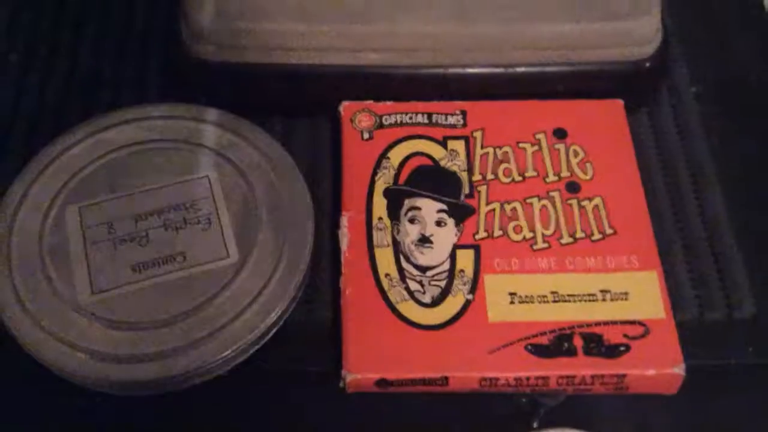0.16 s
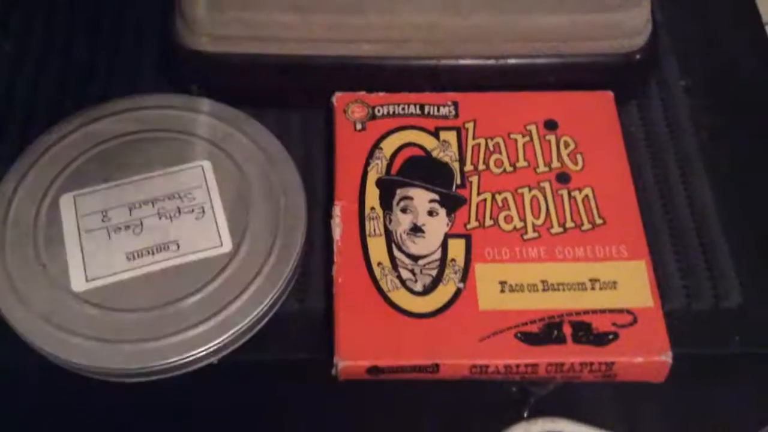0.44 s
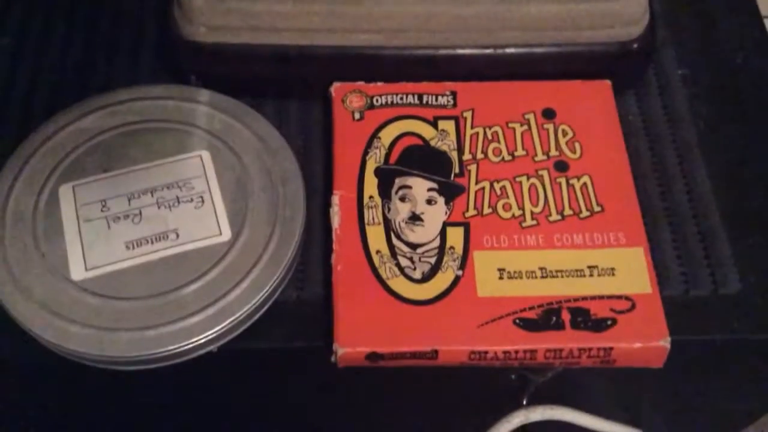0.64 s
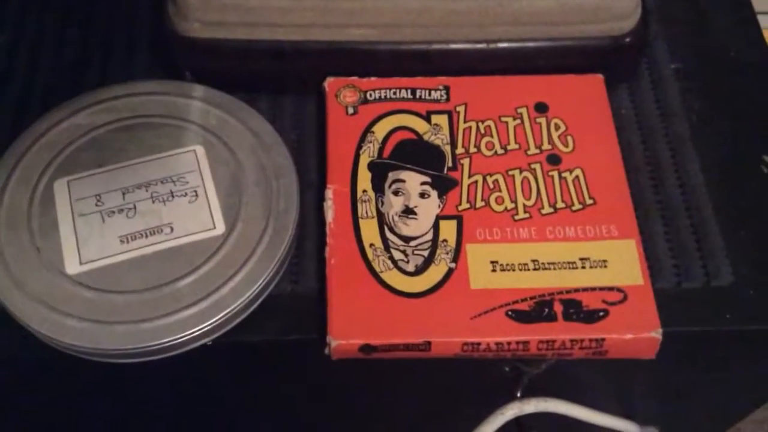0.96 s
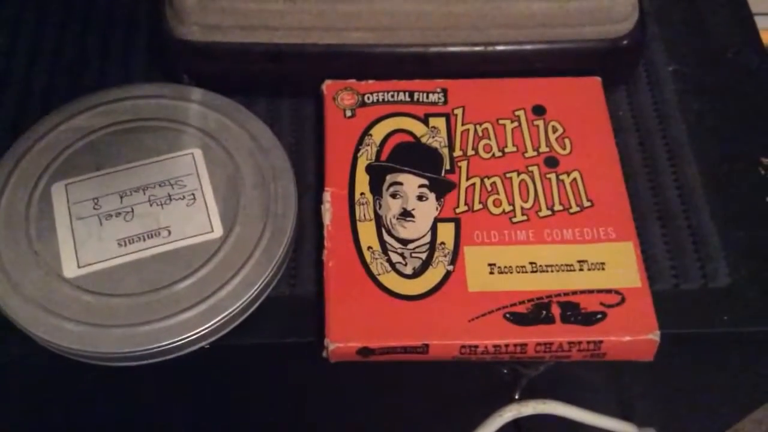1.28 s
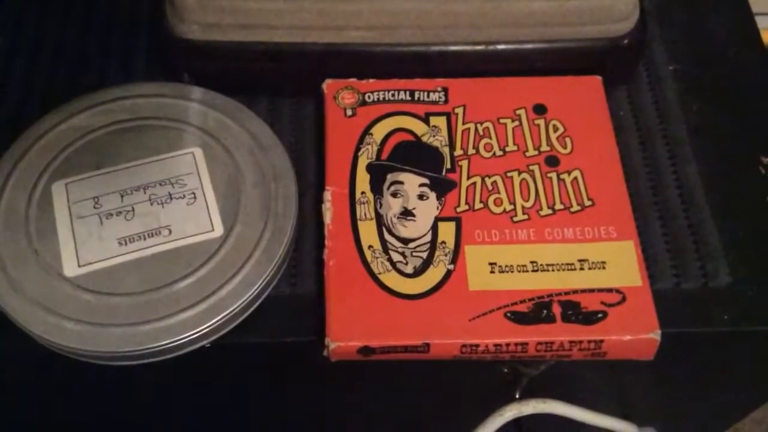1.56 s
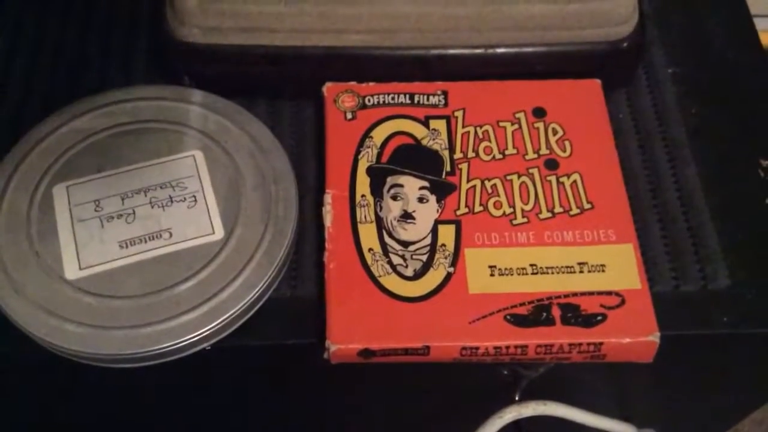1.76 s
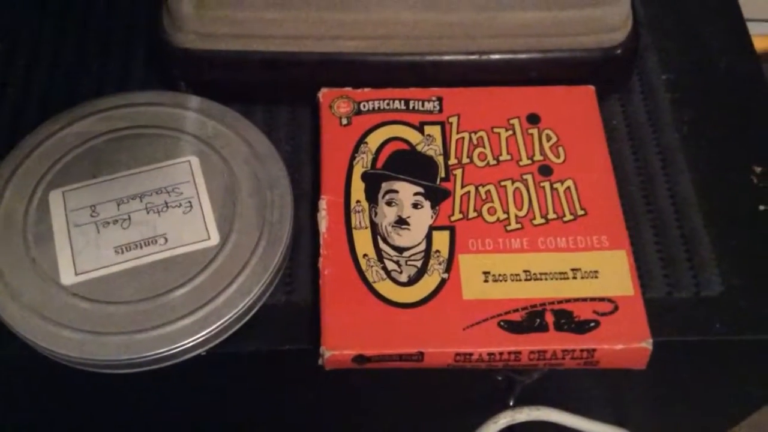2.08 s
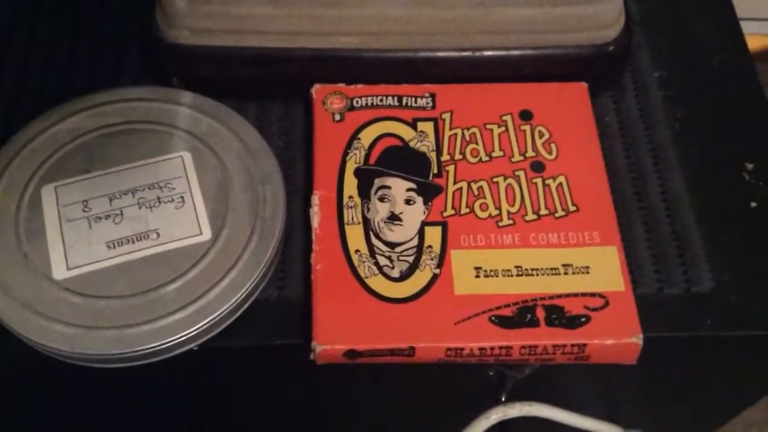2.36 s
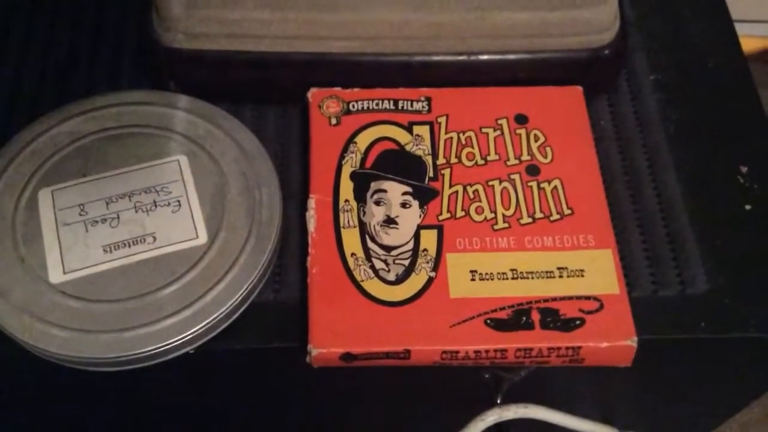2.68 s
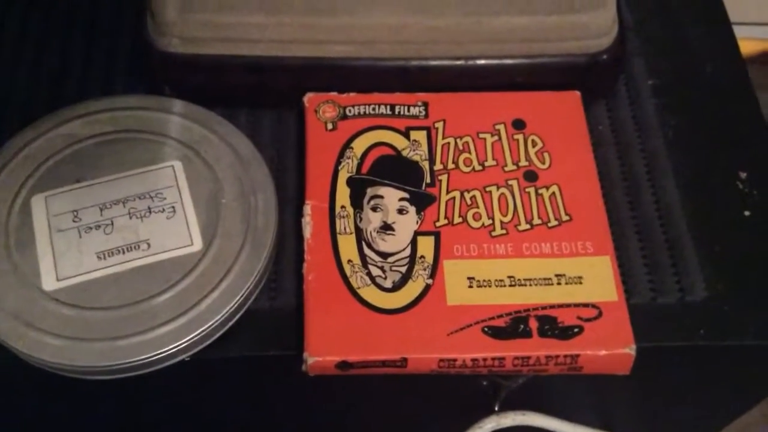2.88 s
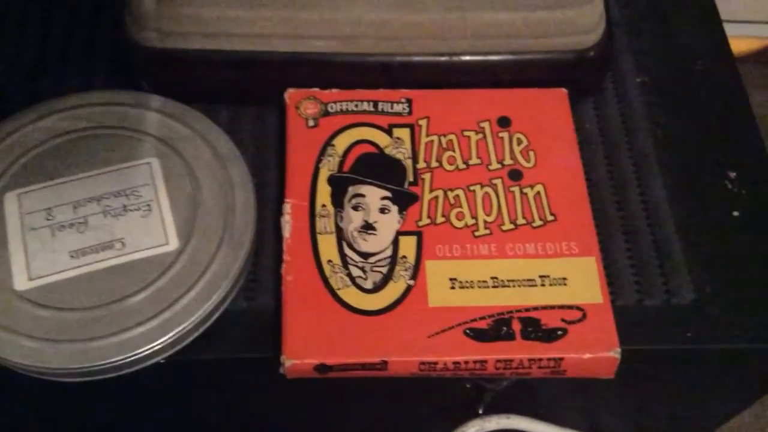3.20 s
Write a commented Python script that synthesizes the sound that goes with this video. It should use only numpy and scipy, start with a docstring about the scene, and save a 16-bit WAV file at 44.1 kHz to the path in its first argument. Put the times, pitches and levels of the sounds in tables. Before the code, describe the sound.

A film projector clatters close by in a small room. Near silence lasts until 0.12 s, then the machine cuts in at full speed. Bright steel ticks, about 25 per second, carry short film scrapes and dull knocks, the sharp ticks softening around 1.55 s. Churning gears, airy whirr, faint swelling whine and low hum continue beneath; barely noticeable soft bass bumps fall near 0.2 and 2.9 s. It runs to the end, about 3.3 s.

```python
"""After about an eighth of a second of near silence, the fast clatter of an old film projector cuts in.
It runs in a small room, heard from close by. A claw ticks for each film frame, about 25 times a second:
struck steel rings and dies away, the film scrapes and shivers as short noise, and the gate knocks.
Under it the gears churn (one stretch of noise, repeated) and fan air whirrs (noise coloured by the case).
Wavering sines make the fan's whine and the motor's hum, and now and then there is a soft bass bump."""
import sys
import numpy as np
from scipy import signal
from scipy.fft import rfft, irfft
from scipy.io import wavfile

SR = 44100
rng = np.random.default_rng(int(sys.argv[2]) if len(sys.argv) > 2 else 0)


def file_out(sig):
    """Save sig as 16-bit WAV at sys.argv[1]."""
    # one column per channel
    cols = np.atleast_2d(sig).T
    # limit, then scale
    lim = np.clip(cols, -1, 1)
    pcm = np.round(lim * 32767).astype(np.int16)
    wavfile.write(sys.argv[1], SR, pcm)


N = 147294
TIME = np.arange(N) / SR  # seconds

# Uneven running of the drive: t/s, lateness of the claw/s
DRIVE_WANDER = [(.13, -.0019), (.55, 0), (.85, .0008), (1.15, .0022), (1.5, .0003), (2.1, -.0015),
                (2.35, -.0009), (2.62, .0002), (2.9, .0001), (3.3, .0003)]
# How hard the claw catches the film: t/s, level/dB
GRIP = [(.15, 3.5), (.27, -2.5), (.5, -0.5), (1.0, -1), (1.38, -2.5), (1.56, -6.5), (1.7, -2), (1.83, 2),
        (2.05, -1.5), (2.55, 1), (2.92, -1.5), (3.25, 2)]
# Ring of the steel claw: f/Hz, relative level/dB, time to fall by 60 dB/s
CLAW_MODES = [(8730, -10.5, 0.0065), (9327, -0.5, .004), (9623, -3, 0.003), (14870, -20, 0.0056),
              (15300, -17.5, 0.0051)]
# Ring of the bracket that carries the claw: f/Hz, relative level/dB, time to fall by 60 dB/s
BRACKET_MODES = [(2930, 1, 0.014), (4060, -2, 0.013), (4447, -8, 0.023), (5100, -3, 0.017),
                 (6036, -3, 0.0098), (6400, -10.5, 0.012)]
# The catch itself and the bracket's bounces after it: typical delay/s, level/dB
BOUNCES = [(0, 0.5), (.0021, -9.5), (.0056, -9.5)]
# Air and bearing noise, shape of the spectrum only: f/Hz, relative level/dB
NOISE_SHAPE = [(20, -23), (85, -13), (120, -12.5), (150, -6), (215, -3), (245, -8), (330, -2.5), (430, -4),
               (550, -0.5), (700, -3.5), (850, 2), (1150, -1), (1300, -3), (1520, -7.5), (1950, -5.5),
               (2120, -8.5), (2400, -5.5), (3000, -14), (3480, -13.5), (4400, -10.5), (6000, -18),
               (7600, -21), (9500, -23.5), (11400, -16), (12200, -27.5), (14000, -19), (15600, -27),
               (16300, -40)]
# Resonances of the housing: f/Hz, width/Hz, lift/dB
HOUSING_MODES = [(157, 12.4, 4), (508, 7, 4.5), (675, 64, 4), (820, 56, 1), (914, 18.4, 7.5),
                 (1016, 19, 6.5), (1025, 16, 2.5), (1150, 28, 4.5), (1884, 14, 5.5), (1977, 33, 5.5),
                 (2241, 104, 8), (2770, 50, 8.5), (3227, 85, 7.5), (5050, 110, 3.5)]
# Tones of the fan: f/Hz, rms level before the swell/dB, waver/Hz, flutter/dB, share of the swell/1
FAN_TONES = [(288.1, -61.5, 0.2, 0.5, 1.03), (576.6, -57, 0.71, 3, 1.4), (893, -51, 3.54, 0.6, 0.55)]
# Swell of the fan's tones: t/s, level/dB
FAN_SWELL = [(.15, -2.5), (.5, 2), (.8, 3), (1.2, -4), (1.65, -6), (2.0, 0), (2.5, 4.5), (2.8, -2.5),
             (3.3, -1)]
# Tones of the motor: f/Hz, rms level/dB, waver/Hz, flutter/dB
MOTOR_TONES = [(62.1, -62.5, 0.1, 1), (100.7, -70.5, .05, 3)]
# Soft low bumps: t/s, level at the peak/dB
BUMPS = [(.195, -52), (2.888, -52)]
# How long the room rings: f/Hz, time to fall by 60 dB/s
ROOM_DECAY = [(200, 0.82), (2000, 0.083), (8000, 0.37), (16000, 0.05)]
# Near reflections: delay/s, level/dB
ECHOES = [(.0011, -15.5), (.0052, -16), (.0064, -23), (0.0112, -17), (0.0186, -26)]

FIRST_S, FRAME_S = .13652, .04062577  # a frame time on the even beat, and the time per frame

# Blow-to-blow differences (rms); DETUNE is a share of the pitch
FORCE_SCATTER_DB, CLAW_SCATTER_DB, KNOCK_SCATTER_DB = 1.76, 0.4, 2
MODE_SCATTER_DB, DETUNE = 0.83, 0.0096
FORCE_GRIP_SHARE = 0.17  # how much of the grip reaches the bracket and the film

# Levels before the room; those of scrape and rattle are also before their filter
CLAW_DB, BRACKET_DB, STRIKE_S = -21, -38.5, 0.00075  # STRIKE_S: time a blow takes to build up
CLAW_DELAY_S, CLAW_ROOM_SHARE = .00015, 0.5
SCRAPE_DB, SCRAPE_S = -53.5, 0.0053  # film sliding after each catch; _S: time to fall to 37 %
RATTLE_DB, RATTLE_S = -45.5, 0.014  # film loop shivering after each pull
SCRAPE_LOW_HZ, SCRAPE_HIGH_HZ = 4500, 14000
KNOCK_HZ, KNOCK_DB, KNOCK_DELAY_S, KNOCK_RISE_S = 1084, -40, 0.0021, 0.0035

WHIRR_DB, FLUTTER_DB = -42.5, 1.33
GEARS_DB, GEARS_TOP_HZ = -50, 2000
BUMP_S, BUMP_LOW_HZ, BUMP_HIGH_HZ = .012, 35, 200
ROOM_DB = -10.5  # whole tail against the direct sound
START_S, MUTED_DB = .1195, -69
EDGE_HZ = 16000


def clatter():
    """For every frame: the claw ticks, its bracket rings, the film scrapes and shivers, the gate knocks."""
    ticks, clacks = np.zeros(N), np.zeros(N)
    t = np.arange(2048) / SR
    band = signal.butter(1, [SCRAPE_LOW_HZ, SCRAPE_HIGH_HZ], "band", fs=SR)
    friction = amp(SCRAPE_DB) * np.exp(-t / SCRAPE_S) + amp(RATTLE_DB) * np.exp(-t / RATTLE_S)
    # The knock swells and fades as one smooth hump
    hump = np.sin(np.pi / 2 * np.clip((t - KNOCK_DELAY_S) / KNOCK_RISE_S, 0, 2))
    knock = hump * np.sin(2 * np.pi * KNOCK_HZ * t)
    for s in frame_times():
        claw_luck, force_luck, knock_luck = rng.standard_normal(3)
        grip = curve(GRIP, s)
        claw_gain = amp(CLAW_DB + grip + CLAW_SCATTER_DB * claw_luck)
        add(ticks, s + CLAW_DELAY_S, claw_gain * ring(CLAW_MODES, t))
        force = amp(FORCE_GRIP_SHARE * grip + FORCE_SCATTER_DB * force_luck)
        for delay, db in BOUNCES:
            blow = force * amp(BRACKET_DB + db) * ring(BRACKET_MODES, t)
            add(clacks, s + delay * rng.uniform(.85, 1.15), blow)
        hiss = signal.lfilter(*band, rng.standard_normal(len(t)))
        add(clacks, s, force * friction * hiss)
        add(clacks, s, amp(KNOCK_DB + KNOCK_SCATTER_DB * knock_luck) * knock)
    # Part of the claw's tick reaches the ear without the room
    return (1 - CLAW_ROOM_SHARE) * ticks + room(clacks + CLAW_ROOM_SHARE * ticks)


def frame_times():
    """The moments at which the claw catches the film: an even beat made early or late by the drive."""
    even = np.arange(FIRST_S - 3 * FRAME_S, N / SR, FRAME_S)
    return even + curve(DRIVE_WANDER, even)


def ring(modes, t):
    """Struck metal: dying sines, with pitch and level a little different at each blow."""
    hz, db, t60 = np.transpose(modes)[:, :, None]
    db = db + MODE_SCATTER_DB * rng.standard_normal(db.shape)
    hz = hz * (1 + DETUNE * rng.standard_normal(hz.shape))
    decay = np.exp(-np.log(1000) * t / t60)
    waves = amp(db) * decay * np.sin(2 * np.pi * hz * t)
    onset = np.sin(np.pi / 2 * np.minimum(t / STRIKE_S, 1)) ** 2
    return waves.sum(0) * onset


def gears():
    """The same rough teeth mesh again on every turn of the shutter shaft, so one noise repeats."""
    churn = np.zeros(N)
    turn = rng.standard_normal(round(FRAME_S * SR))
    for s in frame_times():
        add(churn, s, turn)
    dull = signal.lfilter(*signal.butter(1, GEARS_TOP_HZ, fs=SR), churn)
    return amp(GEARS_DB) * housing(dull)


def whirr():
    """Fan air in the housing: noise whose level flutters quickly."""
    flutter = amp(FLUTTER_DB * drift(rate_hz=97))
    return amp(WHIRR_DB) * housing(rng.standard_normal(N) * flutter)


def housing(x):
    """Shapes a noise and lifts it where the case resonates, then sets its rms to 1."""
    hz = np.fft.rfftfreq(N, 1 / SR)
    db = spectrum(NOISE_SHAPE, hz)
    for f, width, lift in HOUSING_MODES:
        db = db + lift / (1 + (2 * (hz - f) / width) ** 2)
    return unit(irfft(rfft(x) * amp(db), N))


def whine_and_hum():
    """The swelling whine of the fan and the hum of the motor, built from wavering sines."""
    swell = curve(FAN_SWELL, TIME)
    mix = np.zeros(N)
    for hz, db, waver, flutter, share in FAN_TONES:
        mix += amp(db + share * swell) * tone(hz, waver, flutter)
    for hz, db, waver, flutter in MOTOR_TONES:
        mix += amp(db) * tone(hz, waver, flutter)
    return mix


def tone(hz, waver_hz, flutter_db):
    """A sine of rms 1 whose pitch and level both wander a little."""
    turns = np.cumsum(hz + waver_hz * drift(rate_hz=13.1)) / SR + rng.random()
    return unit(amp(flutter_db * drift(rate_hz=21)) * np.sin(2 * np.pi * turns))


def bumps():
    """Short, dull puffs of bass: low noise let through in smooth humps."""
    band = signal.butter(2, [BUMP_LOW_HZ, BUMP_HIGH_HZ], "band", fs=SR, output="sos")
    low = unit(signal.sosfilt(band, rng.standard_normal(N)))
    return low * sum(amp(db) * np.exp(-((TIME - s) / BUMP_S) ** 2) for s, db in BUMPS)


def room(x):
    """The direct sound, a few near reflections and a tail of noise that dies at its own rate per pitch."""
    hz, t, noise = signal.stft(rng.standard_normal(SR // 2), SR, nperseg=256)
    decay = np.exp(-np.log(1000) * t / spectrum(ROOM_DECAY, hz)[:, None])
    tail = signal.istft(noise * decay, SR)[1]
    response = amp(ROOM_DB) * tail / np.linalg.norm(tail)
    for delay, db in [(0, 0.0044)] + ECHOES:  # the first entry is the direct sound
        add(response, delay, amp([db]))
    return signal.fftconvolve(x, response)[:N]


def drift(rate_hz):
    """Smooth random wander of rms 1; a higher rate wanders faster."""
    hz = np.fft.rfftfreq(N, 1 / SR)
    keep = np.exp(-(hz / rate_hz) ** 2) * (hz > 0)
    return unit(irfft(rfft(rng.standard_normal(N)) * keep, N))


def amp(db):
    """Turns decibels into a gain."""
    return 10 ** (np.asarray(db) / 20)


def unit(x):
    """Scales a sound to rms 1."""
    return x / np.sqrt(np.mean(x ** 2) + 1e-20)


def curve(points, at):
    """Reads a table along straight lines."""
    return np.interp(at, *np.transpose(points))


def spectrum(points, hz):
    """Reads a table along straight lines on a log-frequency axis."""
    f, value = np.transpose(points)
    return np.interp(np.log(hz + 1), np.log(f), value)


def add(mix, s, sound):
    """Mixes a sound in at time s, cutting off what falls outside."""
    at = round(s * SR)
    sound = sound[max(-at, 0):]
    part = mix[max(at, 0):][:len(sound)]
    part += sound[:len(part)]


def scene():
    """The running projector in its room."""
    return (clatter() + gears() + whirr() + whine_and_hum() + bumps())[None]


def record(dry):
    """The sound cuts in abruptly; a filter then removes the highest treble."""
    opened = dry * np.where(TIME < START_S, amp(MUTED_DB), 1)
    lowpass = signal.firwin(255, EDGE_HZ, window=("kaiser", 8), fs=SR)
    return signal.oaconvolve(opened, lowpass[None], "same")


dry = scene()
out = record(dry)
file_out(out)
```